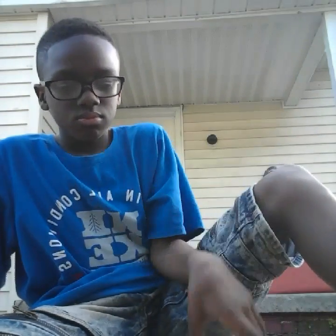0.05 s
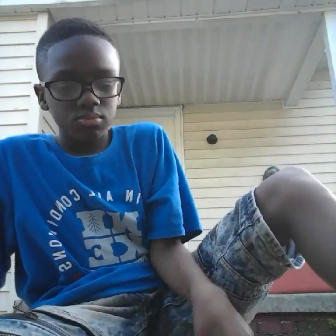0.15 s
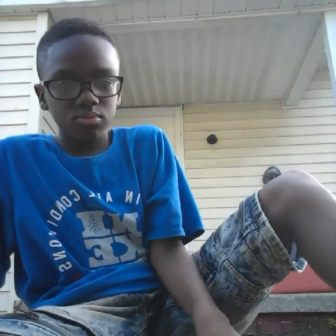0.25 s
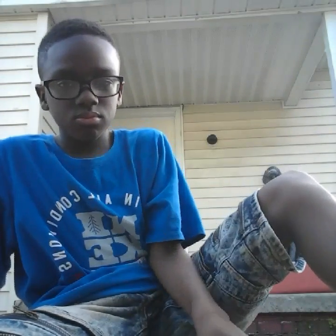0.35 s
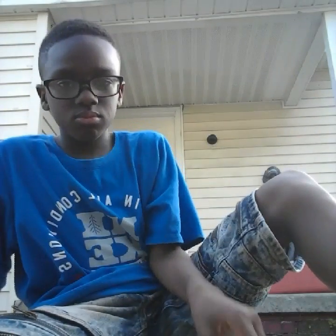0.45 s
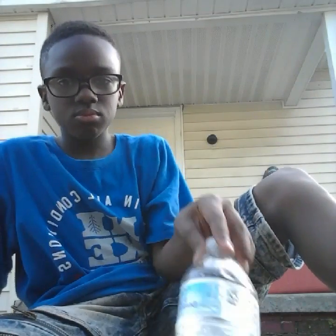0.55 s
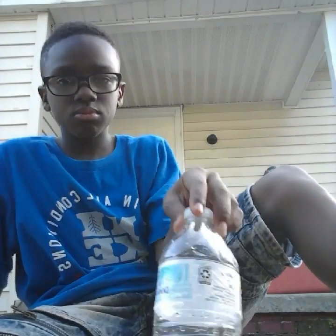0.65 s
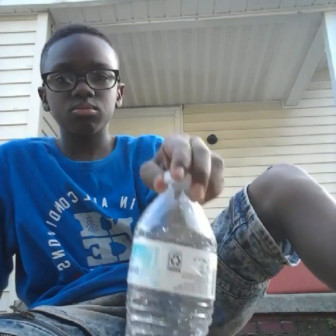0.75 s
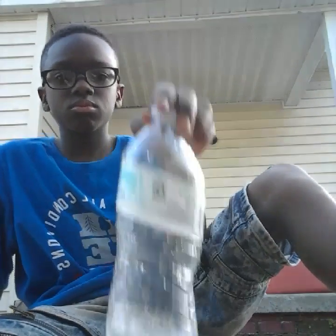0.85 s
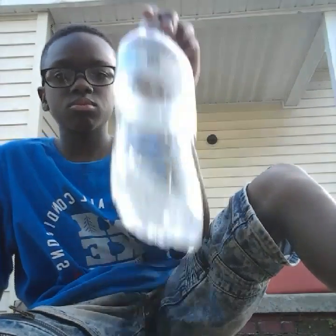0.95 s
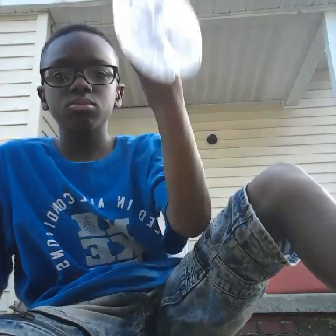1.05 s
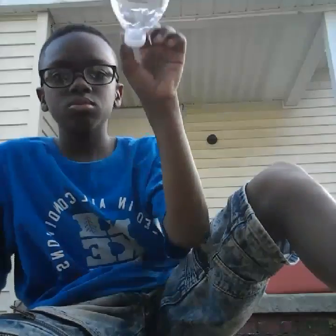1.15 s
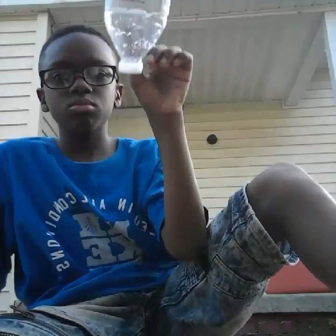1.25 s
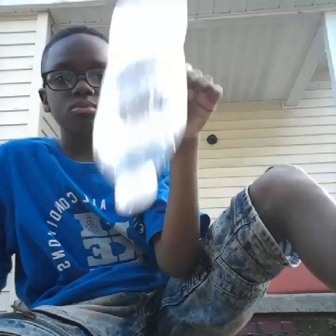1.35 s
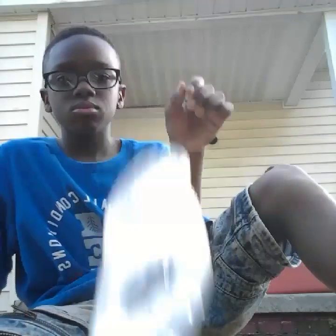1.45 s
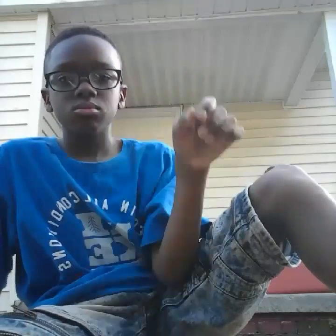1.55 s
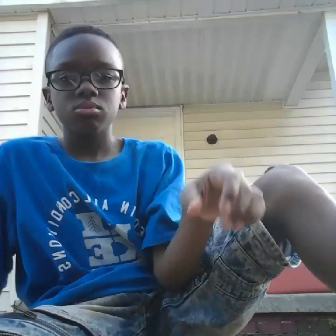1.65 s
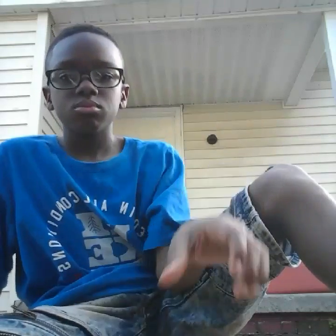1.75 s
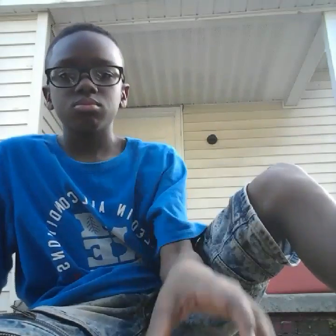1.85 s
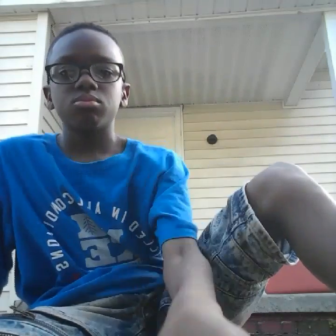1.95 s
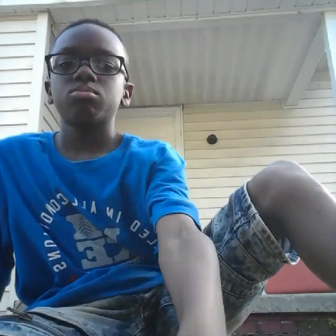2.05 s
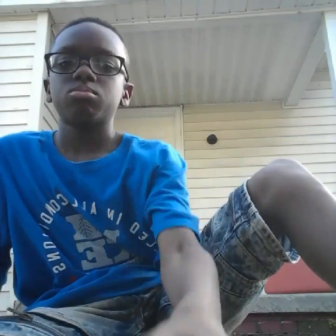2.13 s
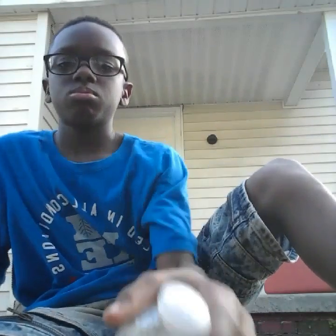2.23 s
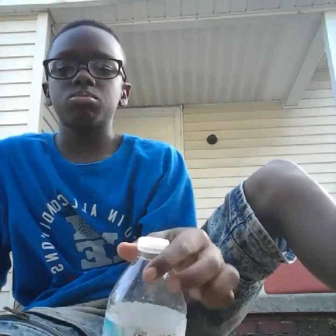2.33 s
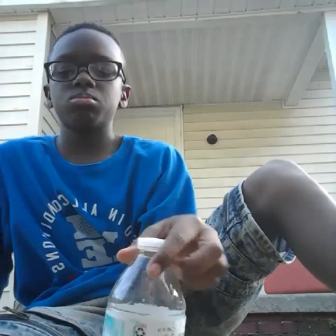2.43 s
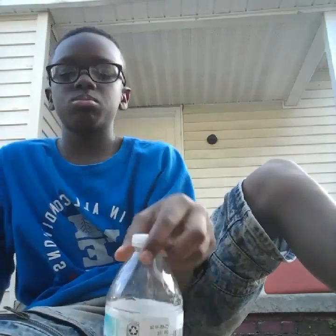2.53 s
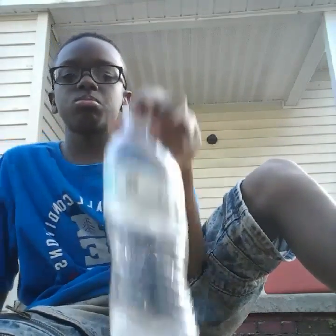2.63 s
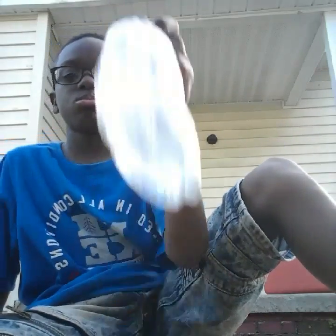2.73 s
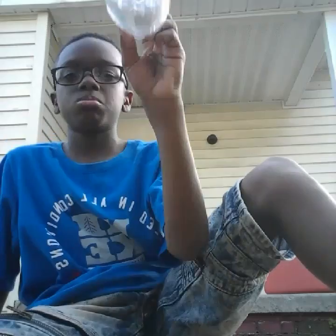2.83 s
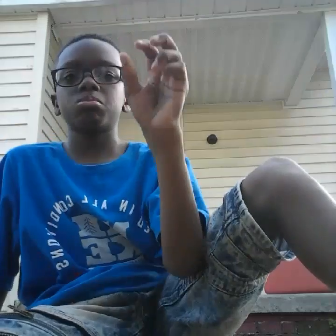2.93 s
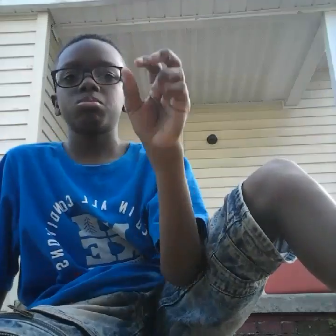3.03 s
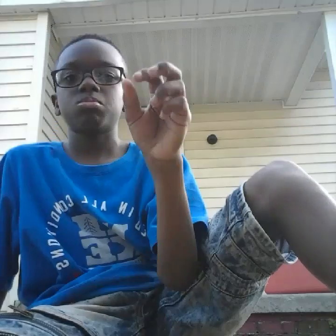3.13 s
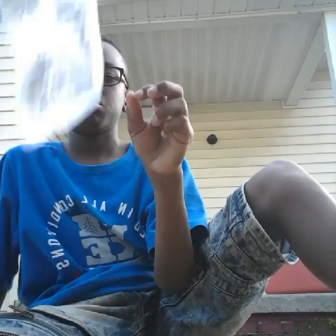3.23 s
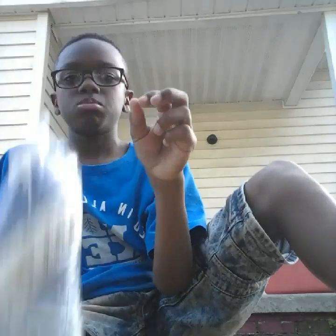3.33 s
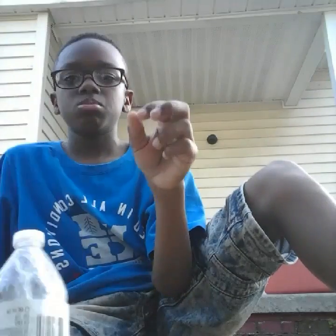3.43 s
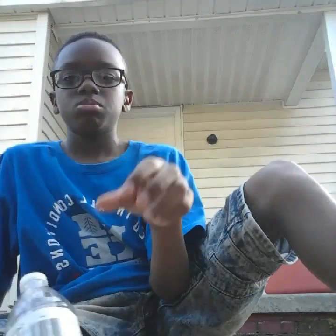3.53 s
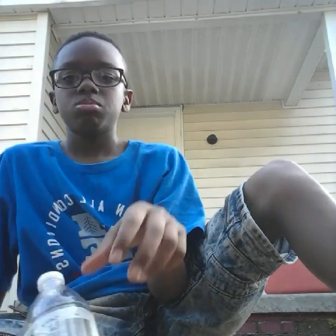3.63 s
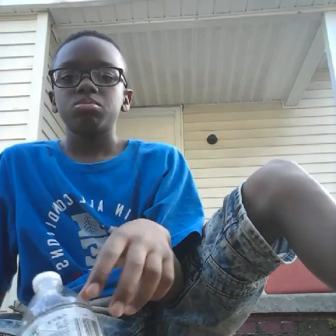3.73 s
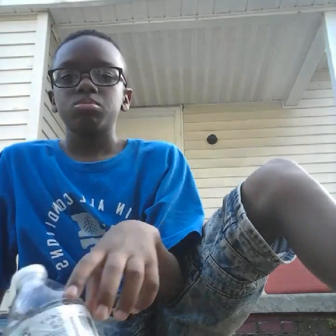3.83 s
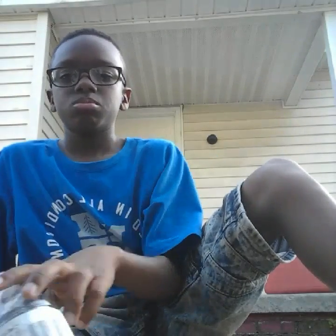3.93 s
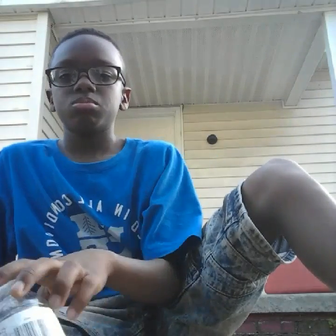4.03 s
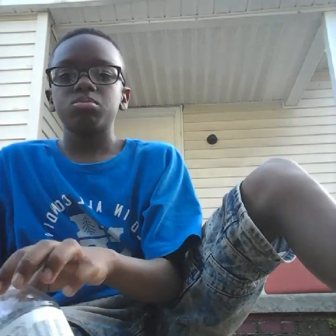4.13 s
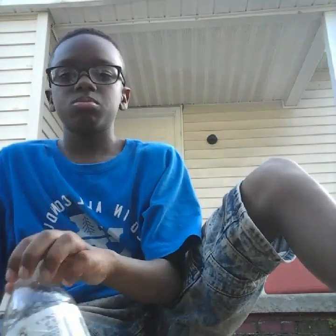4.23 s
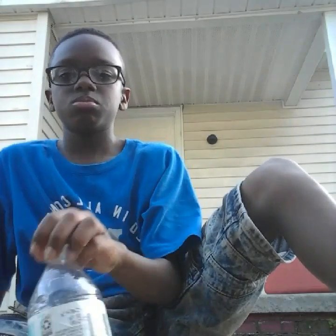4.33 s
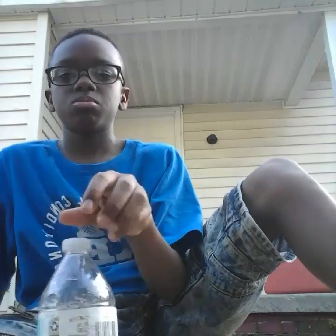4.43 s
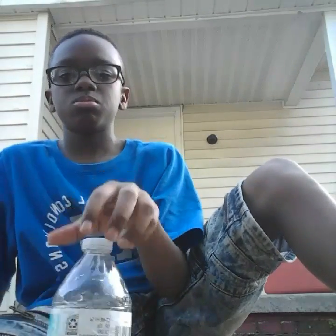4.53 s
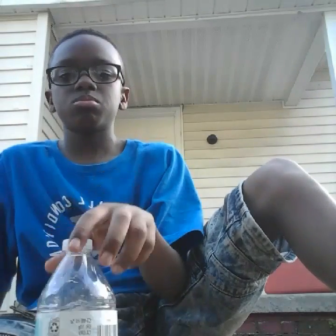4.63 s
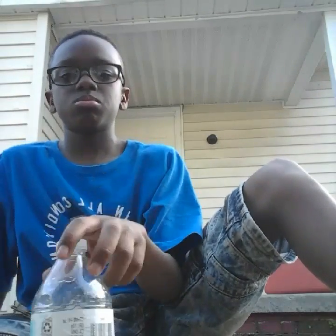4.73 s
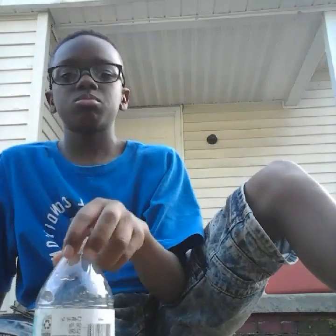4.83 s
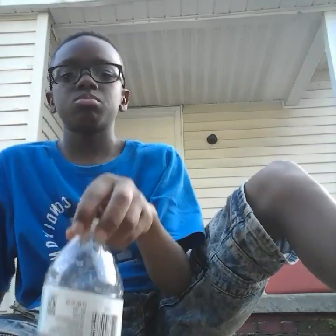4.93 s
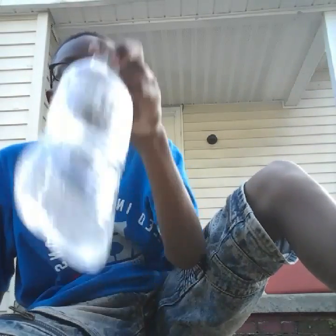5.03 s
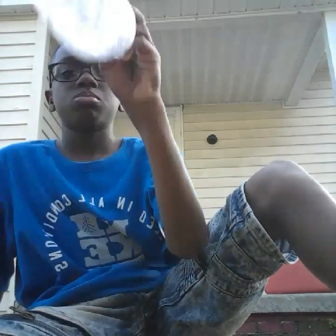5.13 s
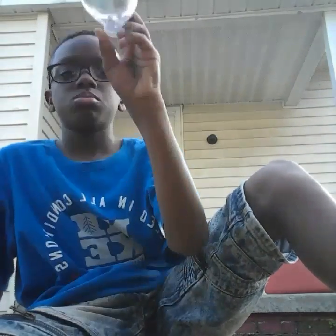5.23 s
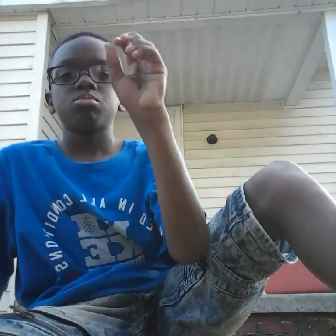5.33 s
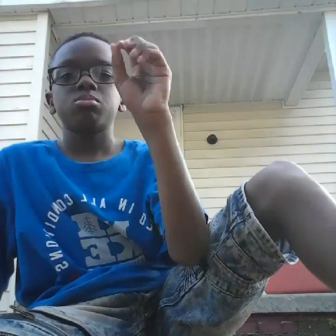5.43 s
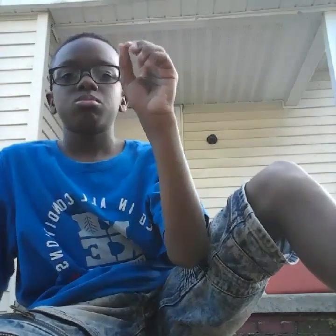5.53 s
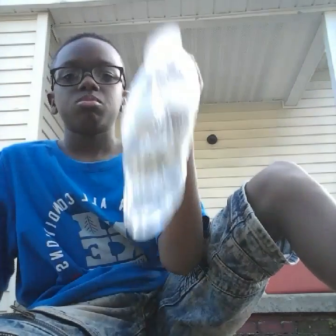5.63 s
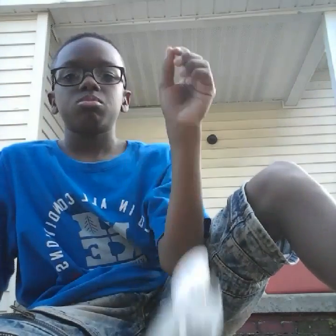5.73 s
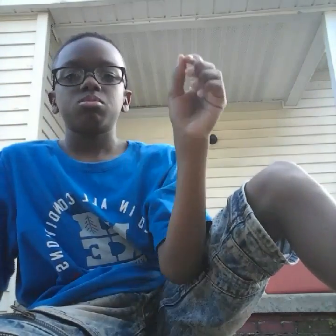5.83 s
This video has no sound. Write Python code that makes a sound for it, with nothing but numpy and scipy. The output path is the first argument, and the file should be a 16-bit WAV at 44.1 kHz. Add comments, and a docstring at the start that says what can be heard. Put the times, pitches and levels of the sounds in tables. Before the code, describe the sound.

A part-filled plastic bottle crinkles in the fingers, is flipped, and lands twice with sharp cracks and sloshing water over faint outdoor rumble.

```python
"""Water bottle flipped on a porch

A part-filled plastic bottle is flipped on a house porch, close to the microphone, and lands twice.
Its thin shell cracks as filtered noise bursts; the water slams down after it as decaying low modes.
Fingers crinkle the plastic in short snaps; water sloshes as noise grains and ringing air pockets.
A low outdoor rumble, a faint hum and a soft hiss, all continuous, lie underneath.
"""
import sys
import numpy as np
from scipy import signal
from scipy.fft import rfft, irfft, next_fast_len
from scipy.io import wavfile

SR = 44100
rng = np.random.default_rng(int(sys.argv[2]) if len(sys.argv) > 2 else 0)


def file_out(sig):
    """Save sig as 16-bit WAV at sys.argv[1]."""
    # one column per channel
    cols = np.atleast_2d(sig).T
    # limit, then scale
    lim = np.clip(cols, -1, 1)
    pcm = np.round(lim * 32767).astype(np.int16)
    wavfile.write(sys.argv[1], SR, pcm)


N = 259308  # length in samples

# Spectrum of the soft hiss. Each row: frequency in Hz, relative density in dB.
AIR_SPECTRUM = [(120, -33), (200, -4), (335, -2.5), (400, -10.5), (445, -19), (532, -1.5), (635, -13.5),
                (786, -8), (1950, -14.5), (2450, -12), (4910, -28.5), (6520, -32), (7380, -26), (8660, -33),
                (14000, -36)]
# Spectrum of the outdoor rumble. Each row: frequency in Hz, relative density in dB.
RUMBLE_SPECTRUM = [(20, -36.5), (45, -16), (80, -5.5), (97, 0.5), (120, 3.5), (145, -10.5), (175, -4.5),
                   (250, -16.5), (400, -13.5), (800, -67)]
# A distant machine. Each row: frequency in Hz, level in dB against the hiss.
HUM_TONES = [(118.4, -12), (333, -21), (528, -22), (592, -19.5), (1001, -24), (1120, -20.5), (1357, -20)]
# Dips of the hiss. Each row: start in seconds, depth in dB, seconds from the start until it creeps back.
HISS_DIP_EVENTS = [(0.064, 4.5, 0.26), (1.78, 8, 0.99), (3.622, 7.5, 0.78)]
# Soft low bumps as the thrower moves. Each row: middle in seconds, level in dB, half length in seconds.
BODY_BUMPS = [(.02, -50.5, 0.045), (.25, -51, 0.074), (.516, -47, 0.027), (.66, -47, .02),
              (.78, -56, 0.069), (.948, -45.5, 0.022), (1.15, -51, 0.018), (1.518, -42.5, 0.011),
              (2.2, -57, .12), (3.066, -55.5, 0.011), (3.34, -47, 0.03), (4.2, -55, 0.22),
              (4.74, -46, 0.088), (5.12, -49.5, 0.013), (5.24, -47, 0.0083), (5.31, -47, 0.0084),
              (5.47, -48.5, 0.039), (5.665, -44, 0.019)]
# Reverberation of the porch. Each row: frequency in Hz, 60 dB decay time in seconds.
PORCH_DECAY = [(100, 0.37), (1000, 0.36), (4000, 0.19), (12000, 0.11)]
# Spectrum of moving water. Each row: frequency in Hz, relative density in dB.
WATER_SPECTRUM = [(71, -35.5), (120, -4.5), (195, 1.5), (409, 1.5), (646, -8.5), (791, -4.5), (929, -9),
                  (3000, -31.5), (3900, -55), (6600, -120)]
# Water churning in the bottle. Each row: start in seconds, length in seconds, relative level in dB.
SLOSH_STROKES = [(.45, .08, -50), (.76, .18, -55), (1.78, 0.018, -42), (2.21, 0.028, -62.5),
                 (2.63, 0.11, -64), (3.04, 0.0077, -59), (3.77, 0.16, -54.5), (4.07, .03, -58),
                 (4.53, 0.3, -48.5)]
# Lumps of water slap the wall and gulp a pocket of air.
# Each row: start in seconds, pocket level in dB, starting pitch in Hz, slap level in dB.
GULP_EVENTS = [(0.503, -33, 407, -30.5), (.933, -33, 280, -33), (0.948, -25, 384.4, -41),
               (1.594, -33.5, 166, -51), (2.648, -54.5, 326, -46.5), (2.743, -42, 320, -47),
               (3.773, -33, 262, -43), (4.524, -34.5, 392, -36), (4.605, -36, 228, -36.5),
               (4.636, -26.5, 414, -39.5), (4.683, -40, 1520, -36), (4.716, -28.5, 373, -42.5),
               (4.813, -35, 400, -38), (4.84, -29, 260, -39.5), (5.08, -39, 403, -42)]
# Water sweeps along the wall as the bottle turns over.
# Each row: middle in seconds, level in dB, half length in seconds.
SPRAY_SWISHES = [(1.346, -60.5, 0.018), (3.045, -54, 0.015), (3.437, -58.5, 0.007), (5.082, -49, 0.011),
                 (5.44, -63, 0.03)]
# Plastic and cloth rubbing, spray on the wall of the bottle.
# Each row: start in seconds, length in seconds, relative level in dB.
RUB_STROKES = [(.37, .6, -58.5), (.585, 0.02, -49), (.745, 0.068, -51), (1.79, 0.051, -46),
               (1.93, 0.082, -73), (2.185, .045, -55), (2.67, 0.059, -58), (3.62, 0.038, -38.5),
               (3.8, 0.12, -56.5), (3.96, 0.18, -75.5), (4.455, 0.033, -59.5), (4.5, 0.051, -54.5),
               (4.6, 0.25, -68.5), (4.84, 0.086, -61.5)]
# Broad spectrum of the cracking shell. Each row: frequency in Hz, relative density in dB.
CRACK_SPECTRUM = [(60, -68.5), (200, -36.5), (900, -10.5), (1700, -4.5), (2500, -3.5), (3300, -2),
                  (4200, -6), (5500, -11.5), (8000, -20), (11500, -27), (13800, -34), (14400, -51),
                  (17000, -63.5)]
# Ringing of the thin wall. Each row: frequency in Hz, width in Hz, relative level in dB.
SHELL_MODES = [(2345, 54, -1.5), (2544, 41, -6), (2680, 45, -13), (2780, 40, -4), (3000, 65, -4.5),
               (3210, 20, 1), (3435, 75, -4.5), (3700, 360, -12), (3980, 35, -7), (4100, 13, -1)]
# Broad spectrum of the hollow knock. Each row: frequency in Hz, relative density in dB.
KNOCK_SPECTRUM = [(60, -52), (200, -16), (320, -14), (400, -4.5), (470, -4), (560, -2), (1000, -5.5),
                  (1200, -4), (1500, -12.5), (2200, -9.5), (4000, -19), (10000, -49.5)]
# Ringing of the stiff base and the air space. Each row: frequency in Hz, width in Hz, relative level in dB.
BASE_MODES = [(597, 17, 2), (681.3, 17, -5.5), (828.5, 28, -4), (996, 24, -3.5), (1236, 14, -4),
              (1465, 60, -1), (1660, 25, -0.5)]
# Spectrum of the instant of a snap. Each row: frequency in Hz, relative density in dB.
TICK_SPECTRUM = [(2500, -26.5), (4600, -3), (6000, 5.5), (9000, -8.5), (13500, -19.5), (15000, -32),
                 (17000, -38)]
# The shell buckles under fingers or rocks on its base. Each row: start in seconds, relative level in dB,
# panel pitch in Hz, then hollow knock and bright tick, both in relative dB on top of that level.
CRINKLE_EVENTS = [(0.0218, -43, 4250, -24, -24), (0.0794, -38.5, 2880, -25, -11),
                  (0.165, -40.5, 2450, 1.5, -39), (0.3681, -28, 3420, -4, -19.5),
                  (0.409, -46, 3120, 6, -22), (0.4385, -25, 2830, -18, -15.5),
                  (0.4612, -16.5, 3380, -26, -30), (0.4716, -26, 2500, -4, -33),
                  (0.4914, -23, 2700, -4, -10), (0.4944, -13.5, 3350, -12, -23.5),
                  (0.5447, -37.5, 2540, -2, -24), (0.5862, -33, 2900, -10, -24),
                  (0.603, -30, 3100, -19, -20), (0.625, -29.5, 3100, -5, -35),
                  (0.6685, -38, 3320, -1, -7.5), (0.7153, -30.5, 3300, -28, -31),
                  (0.7409, -29.5, 3030, -6, -21), (0.7818, -36.5, 3180, -2, -5),
                  (0.871, -36, 2750, -6, -12.5), (0.9313, -34, 3740, -21, -10),
                  (0.9812, -44.5, 3850, -2, -5), (1.903, -42, 2630, -2.5, -27),
                  (1.927, -38, 2450, -19, -31), (1.9715, -46.5, 3370, -22, -24.5),
                  (2.2473, -28, 3470, -14.5, -18), (2.5225, -28, 3980, -14.5, -14),
                  (2.613, -41.5, 3240, -11, -39), (2.6354, -36, 3460, -10.5, -21),
                  (2.739, -41.5, 2453, -3.5, -18), (3.7589, -31.5, 2890, -8, -17.5),
                  (3.7908, -37, 2460, -8, -27), (3.8605, -28.5, 3100, -9.5, -25),
                  (3.8987, -40.5, 3160, -5, -23), (3.9607, -47, 3620, -5.5, -25),
                  (4.0454, -51, 3690, 0.5, -25), (4.1272, -52, 3900, -4.5, -28),
                  (4.5823, -34.5, 2715, -25, -29), (4.8125, -35, 3370, -19, -17),
                  (5.601, -48.5, 2360, -4.5, -14)]
# The loaded bottle and the floor under it.
# Each row: frequency in Hz, relative level in dB, 60 dB decay time in seconds.
THUD_MODES = [(78, -11.5, 0.13), (130, -12.5, .13), (175.5, -3.5, 0.15), (225, -5.5, 0.16), (256, 3, 0.044),
              (324, -3.5, 0.11), (385, -2.5, .1)]
# Bottle meets floor. Each row: start in seconds, then shell crack, hollow knock and water thud in
# relative dB, pitch of the buckling panel in Hz, loss per buckling step in dB.
LANDING_BLOWS = [(1.7311, -11.5, -15.5, -28, 2900, 7.5), (1.741, -37, -27, -21, 712.4, 8),
                 (1.7446, -8, -17, -25, 2800, 2), (1.76, -20.5, -19, -14.5, 893, 11.5),
                 (1.769, -17.5, -22.5, -22.5, 2980, 3.5), (1.812, -28, -31, -47, 3000, 6),
                 (1.847, -34.5, -37, -40.5, 960, 2), (1.8631, -32.5, -33.5, -32, 3060, 15),
                 (3.593, -19.5, -17, -26, 695, 11), (3.5947, -11.5, -14, -21, 1550, 5),
                 (3.6038, -29, -20.5, -7, 3350, 12), (3.6192, -31, -28, -19.5, 2400, 1),
                 (3.633, -33, -36.5, -23, 3320, 8.5), (3.652, -34, -39, -25.5, 3900, 4)]

HISS_DB, SINK_S, RETURN_DB_PER_S = -53, 0.05, 17.5
# The rumble wavers by this rms in dB, up to about WAVER_HZ, and takes this share of the hiss dips.
RUMBLE_DB, RUMBLE_WAVER_DB, WAVER_HZ, RUMBLE_DIP_SHARE = -56, 3.5, 6, 0.86
SLOSH_RISE_S, SLOSH_T60_S = 0.069, 0.38
# Small gulps come at random while the water churns.
SMALL_PER_S, SMALL_OVER_CHURN_DB, SMALL_HZ, SMALL_SLAP_DB = 20, 9.5, 306, -9
RUB_RISE_S, RUB_T60_S = 0.025, 0.189
# Faint snaps come at random while the plastic is rubbed.
FAINT_PER_S, FAINT_OVER_RUB_DB, FAINT_SPREAD_DB = 30, 7.5, 3.5
FAINT_HZ, FAINT_KNOCK_DB, FAINT_TICK_DB = 3200, -1, -23.5
SNAP_T60_S = 0.028
# The base gives way in three quick steps; each dies away this fast.
BUCKLE_AFTER_S, CRACK_T60_S = [0, 0.0035, 0.0088], 0.035
TOP_HZ = 16900  # band limit of the recorder


def amp(db):
    """Level to amplitude: 20 dB is a factor of ten."""
    return 10 ** (np.asarray(db) / 20)


def unit(x):
    """Normalization: equal mean power, rms 1."""
    return x / np.sqrt(np.mean(x ** 2) + 1e-20)


def along(points, hz):
    """Interpolation of (Hz, value) points on a logarithmic frequency axis."""
    f, v = np.transpose(points)
    return np.interp(np.log(hz + 1), np.log(f + 1), v)


def filtered(x, response):
    """Linear filtering: the spectrum is multiplied by a response of frequency."""
    m = next_fast_len(len(x) + 4096)  # padding leaves room for the filter's tail
    return irfft(rfft(x, m) * response(np.fft.rfftfreq(m, 1 / SR)), m)[:len(x)]


def noise(response, size):
    """Coloured noise: white noise shaped by a response, rms 1."""
    return unit(filtered(rng.standard_normal(size), response))


def resonance(hz, centre, width):
    """Damped oscillator: one causal resonance with a peak of 1."""
    return 1j * hz * width / (centre ** 2 - hz ** 2 + 1j * hz * width)


def peaks(modes, hz):
    """Modal superposition: the summed power humps of (Hz, width Hz, dB) resonances."""
    return sum(amp(db) * abs(resonance(hz, centre, width)) ** 2 for centre, width, db in modes)


def highpass(x, edge_hz):
    """Radiation efficiency: a small body radiates little deep bass."""
    return signal.sosfilt(signal.butter(2, edge_hz, "high", fs=SR, output="sos"), x)


def add(track, s, x):
    """Superposition: mix x into the track from time s."""
    start = max(round(s * SR), 0)
    track[start:start + len(x)] += x[:max(N - start, 0)]


def decay(t, t60, attack):
    """Exponential damping after a quick rise."""
    return amp(-60 * t / t60) * (1 - np.exp(-t / attack))


def burst(response, t, t60, attack):
    """Dense modal excitation: dying noise whose energy follows its envelope, not its colour."""
    shape = decay(t, t60, attack)
    return unit(noise(response, len(t)) * shape) * np.sqrt(np.mean(shape ** 2))


def grains(rate, spread_db):
    """Shot noise: tiny impulses at random moments, of widely varying size."""
    present = rng.random(N) < rate / SR
    return present * rng.standard_normal(N) * amp(spread_db * rng.standard_normal(N))


def crackle(rate, hz, scatter, cycles, spread_db):
    """Shot excitation: tiny damped rings at random moments, each with its own pitch and size; rms 1."""
    count = round(rate * N / SR)
    when, pitch, size = rng.standard_normal((count, 3)).T
    start = np.mod(when * N, N).astype(int)
    offset = np.arange(SR // 150)
    turns = hz * np.exp(scatter * pitch)[:, None] * offset / SR
    envelope = np.exp(-turns / cycles) * (1 - np.exp(-2 * turns))
    rings = amp(spread_db * size)[:, None] * np.sin(2 * np.pi * turns) * envelope
    return unit(np.bincount((start[:, None] + offset).ravel(), rings.ravel(), N)[:N])


def strokes(rows, rise_s, t60):
    """Gesture envelope: gain that rises just before each start, holds for the length and dies away."""
    t = np.arange(N) / SR
    gain = np.zeros(N)
    for s, length, db in rows:
        rise = np.clip(1 + (t - s) / rise_s, 0, 1) ** 2
        gain += rise * amp(db - 60 * np.maximum(t - s - length, 0) / t60)
    return gain


def swells(rows):
    """Gaussian envelope: gain of bell-shaped swells, the half length being one standard deviation."""
    t = np.arange(N) / SR
    return sum(amp(db) * np.exp(-((t - s) / half) ** 2 / 2) for s, db, half in rows)


def scattered(gain, per_s, hz, spread_db, scatter):
    """Random point process: (s, dB, Hz) events about as strong as the movement which causes them."""
    count = round(per_s * N / SR)
    when = rng.random(count)
    size, pitch = rng.standard_normal((count, 2)).T
    db = 20 * np.log10(gain[(when * N).astype(int)] + 1e-9)
    heard = db > -68
    events = np.transpose([when * N / SR, db + spread_db * size, hz * np.exp(scatter * pitch)])
    return events[heard]


def hiss_dips():
    """Level modulation: dB per sample of a quick sinking, a hold and a steady return."""
    t = np.arange(N) / SR
    total_db = np.zeros(N)
    for s, depth_db, hold in HISS_DIP_EVENTS:
        sinking = np.clip((t - s) / SINK_S, 0, 1)
        total_db -= sinking * np.clip(depth_db - RETURN_DB_PER_S * (t - s - hold), 0, depth_db)
    return total_db


def hum():
    """Phase wander: faint, slightly unsteady tones of a machine somewhere outdoors."""
    t = np.arange(N) / SR
    tones = np.zeros(N)
    for hz, db in HUM_TONES:
        drift = noise(lambda f: 1 / (1 + (f / 3) ** 4), N)
        tones += amp(db) * np.sqrt(2) * np.sin(2 * np.pi * hz * t + 1.2 * drift)
    return tones


def background():
    """Stationary noise, slowly modulated: uneven rumble with bumps, hum, and hiss with a high bright band."""
    dip_db = hiss_dips()
    waver_db = RUMBLE_WAVER_DB * noise(lambda hz: 1 / (1 + (hz / WAVER_HZ) ** 4), N)
    rumble_gain = amp(RUMBLE_DB + waver_db + RUMBLE_DIP_SHARE * dip_db) + swells(BODY_BUMPS)
    rumble = rumble_gain * noise(lambda hz: amp(along(RUMBLE_SPECTRUM, hz)), N)
    air = noise(lambda hz: amp(along(AIR_SPECTRUM, hz)) * (hz < 14000), N)
    sheen = noise(lambda hz: resonance(hz, 7400, width=800) ** 2, N)
    return rumble + amp(HISS_DB + dip_db) * (amp(-5) * air + amp(-24) * sheen + hum())


def porch(x):
    """Diffuse reverberation: siding and ceiling answer with a short tail, faster dying in the treble."""
    hz, t, z = signal.stft(rng.standard_normal(SR // 2), SR, nperseg=256)
    fading = z * amp(-60 * t / along(PORCH_DECAY, hz)[:, None])
    tail = signal.istft(fading, SR, nperseg=256)[1]
    delayed = np.pad(x, (round(0.008 * SR), 0))
    return signal.fftconvolve(delayed, tail / np.linalg.norm(tail))[:N]


def plastic(hz, ring_db=9):
    """Modal colour of the shell: a broad crack with the wall's resonances on it."""
    return amp(along(CRACK_SPECTRUM, hz)) * (1 + amp(ring_db) * peaks(SHELL_MODES, hz))


def hollow(hz, ring_db=8):
    """Cavity and plate resonance: the colour of the bottle's stiff base and its air space."""
    return amp(along(KNOCK_SPECTRUM, hz)) * (1 + amp(ring_db) * peaks(BASE_MODES, hz))


def panel(hz, centre_hz, width_hz, lift):
    """Local resonance: the part of the wall that gives way lifts the band around its own pitch."""
    return 1 + lift * abs(resonance(hz, centre_hz, width_hz)) ** 2


def sharpness(hz, crack_db, onset_db=-10):
    """Nonlinear brightening: the harder the shell is crushed, the more it crackles at the very top."""
    return 1 + amp(2 * (crack_db - onset_db)) * abs(resonance(hz, 11000, width=3300)) ** 2


def water():
    """Bubble resonance: churning lumps slap the wall and trap air that rings briefly, rising in pitch."""
    churn = unit(filtered(grains(rate=2000, spread_db=2), lambda hz: amp(along(WATER_SPECTRUM, hz))))
    motion = strokes(SLOSH_STROKES, SLOSH_RISE_S, SLOSH_T60_S)
    out = amp(1) * churn * motion
    t = np.arange(SR // 8) / SR
    small = scattered(amp(SMALL_OVER_CHURN_DB) * motion, SMALL_PER_S, SMALL_HZ, spread_db=3.5, scatter=0.35)
    small_gulps = [(s, db, hz, db + SMALL_SLAP_DB) for s, db, hz in small]
    for s, db, hz, slap_db in list(GULP_EVENTS) + small_gulps:
        life = 0.015 + 7 / hz  # low pockets ring longer
        phase = 2 * np.pi * hz * (t + 0.11 * t ** 2 / life)
        pocket = amp(db) * decay(t, life, attack=0.00075) * np.sin(phase)
        slap = amp(slap_db) * burst(hollow, t, t60=0.055, attack=0.0029)
        add(out, s, pocket + slap)
    return out


def swishes():
    """Dense droplet impacts: fine spray hisses along the wall of the spinning bottle."""
    spray = filtered(grains(rate=9200, spread_db=0.5), lambda hz: resonance(hz, 3480, width=1400) ** 2)
    return swells(SPRAY_SWISHES) * unit(spray)


def rustle():
    """Stick-slip friction: little slips and droplets ping patches of the shell, over a finer rubbing."""
    pings = crackle(rate=900, hz=3190, scatter=0.21, cycles=5.3, spread_db=7)
    rubbing = unit(filtered(grains(rate=6700, spread_db=2), plastic))
    return (amp(-6) * pings + amp(-2.5) * rubbing) * strokes(RUB_STROKES, RUB_RISE_S, RUB_T60_S)


def crinkles():
    """Snap-through buckling: each snap ticks, rings one panel and, for longer, the whole bottle."""
    out, t = np.zeros(N), np.arange(SR // 12) / SR
    rub = strokes(RUB_STROKES, RUB_RISE_S, RUB_T60_S)
    faint = scattered(rub, FAINT_PER_S, FAINT_HZ, FAINT_SPREAD_DB, scatter=0.28)
    faint_snaps = [(s, db + FAINT_OVER_RUB_DB, hz, FAINT_KNOCK_DB, FAINT_TICK_DB) for s, db, hz in faint]

    def body_colour(hz):
        return hollow(hz) * panel(hz, centre_hz=1300, width_hz=410, lift=6.3)

    for s, db, panel_hz, knock_db, tick_db in list(CRINKLE_EVENTS) + faint_snaps:
        def wall_colour(hz):
            rolloff = np.sqrt(1 + (hz / 5500) ** 6)
            return plastic(hz, ring_db=1) * panel(hz, panel_hz, width_hz=640, lift=2.7) / rolloff

        snap = burst(wall_colour, t, SNAP_T60_S, attack=0.00075)
        tick = burst(lambda hz: amp(along(TICK_SPECTRUM, hz)), t, SNAP_T60_S * 0.79, attack=0.00056)
        body = burst(body_colour, t, SNAP_T60_S * 2.8, attack=0.0012)
        add(out, s, amp(db - 3) * (snap + amp(tick_db) * tick + amp(knock_db - 3.5) * body))
    return out


def water_thud(t):
    """Modal impact response: low modes ring, the shifting water changing each one from blow to blow."""
    thud = np.zeros(len(t))
    for hz, db, life in THUD_MODES:
        gain = amp(db + rng.normal(0, 1))
        tone = np.sin(2 * np.pi * hz * t + rng.normal(0, 0.46))
        thud += gain * decay(t, life, attack=0.00038) * tone
    return thud


def landings():
    """Impact and buckling: the base gives way in quick steps; the water's weight rings the low modes."""
    shell, low, t = np.zeros(N), np.zeros(N), np.arange(SR // 6) / SR
    for s, crack_db, knock_db, thud_db, panel_hz, loss_db in LANDING_BLOWS:
        for step, after_s in enumerate(BUCKLE_AFTER_S):
            def crack_colour(hz):
                return plastic(hz) * sharpness(hz, crack_db - loss_db * step)

            crack = amp(crack_db) * burst(crack_colour, t, CRACK_T60_S, attack=0.00016)
            knock = amp(knock_db) * burst(hollow, t, CRACK_T60_S, attack=0.0004)
            buckle = filtered(crack + knock, lambda hz: 1 + resonance(hz, panel_hz, width=330))
            add(shell, s + after_s, amp(-loss_db * step) * buckle)
        add(low, s, amp(thud_db - 7.5) * water_thud(t))

    def ringing(hz):
        return sum(amp(db) * resonance(hz, centre, width) for centre, width, db in SHELL_MODES + BASE_MODES)

    # wall and base keep ringing at their own pitches after each crack
    ring = filtered(shell, ringing)
    return amp(-0.5) * shell + amp(-13.5) * ring + highpass(low, edge_hz=82)


def scene():
    """Superposition of the outdoor background, the bottle and its echo."""
    bottle = landings() + crinkles() + rustle() + swishes() + water()
    return (bottle + amp(-19.5) * porch(bottle) + background())[None]


def record(dry):
    """Saturation and band limiting: the recorder rounds off the highest peaks and cuts the top."""
    rounded = dry[0] / (1 + np.abs(dry[0] / 0.8) ** 6) ** (1 / 6)
    return filtered(rounded, lambda hz: hz < TOP_HZ)[None]


dry = scene()
out = record(dry)
file_out(out)
```